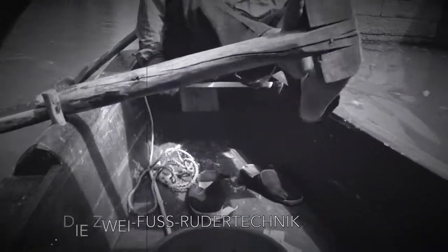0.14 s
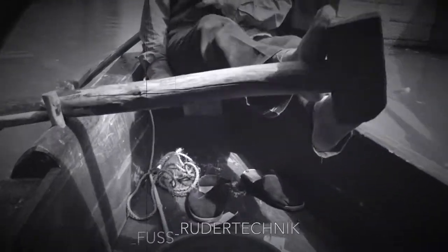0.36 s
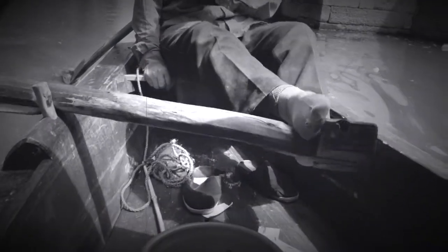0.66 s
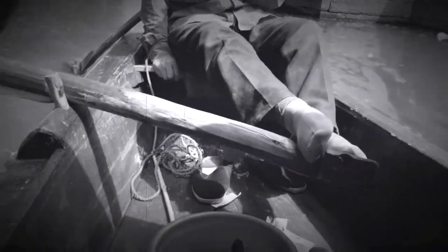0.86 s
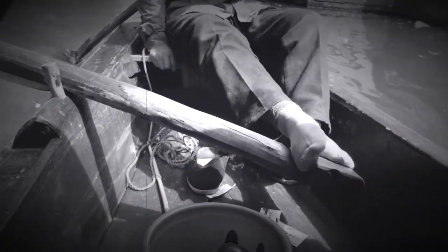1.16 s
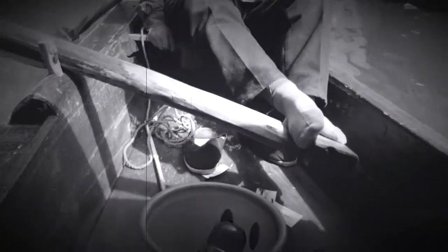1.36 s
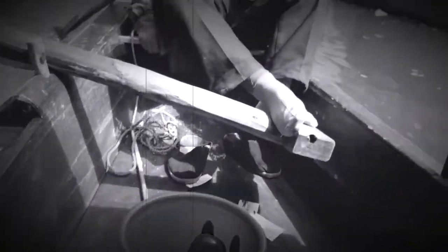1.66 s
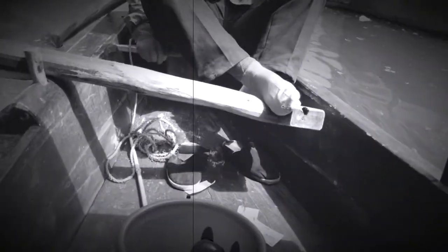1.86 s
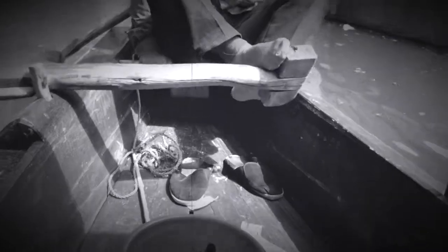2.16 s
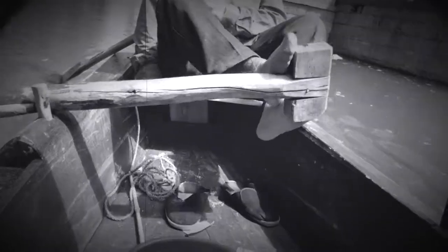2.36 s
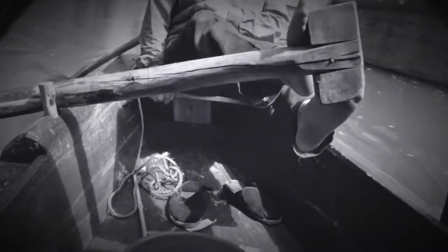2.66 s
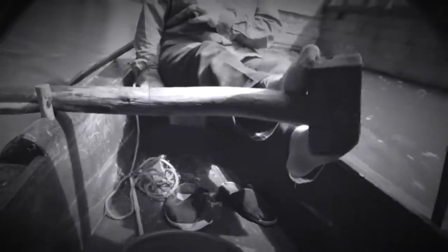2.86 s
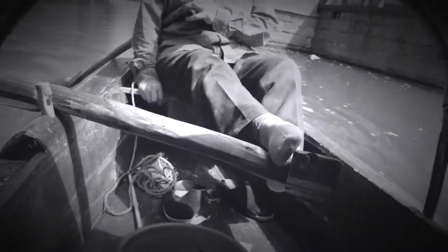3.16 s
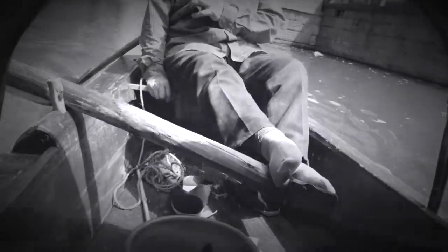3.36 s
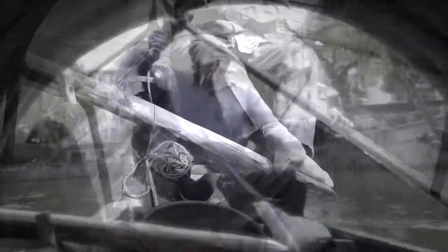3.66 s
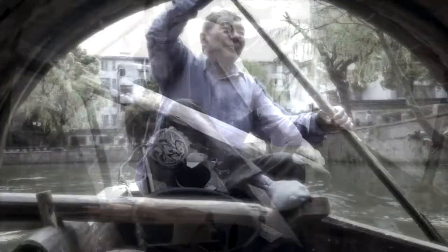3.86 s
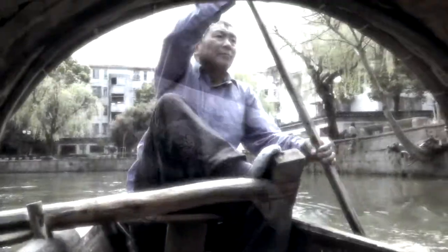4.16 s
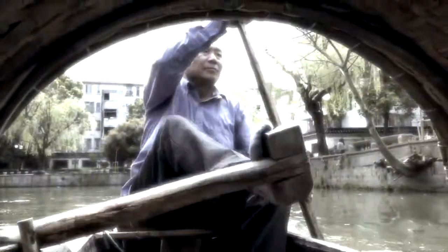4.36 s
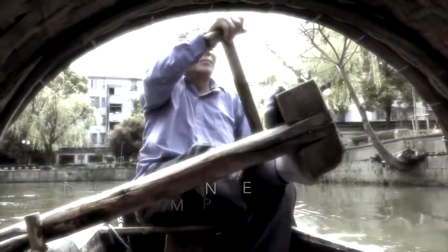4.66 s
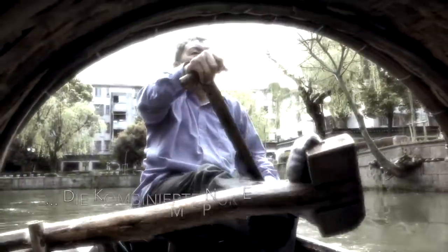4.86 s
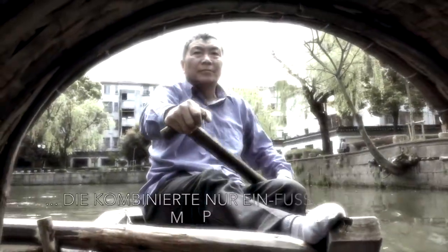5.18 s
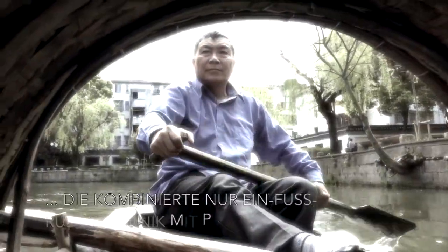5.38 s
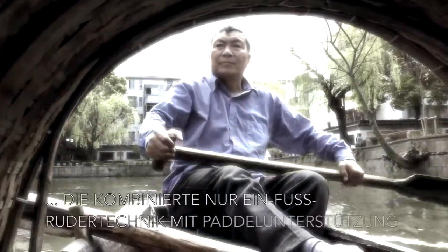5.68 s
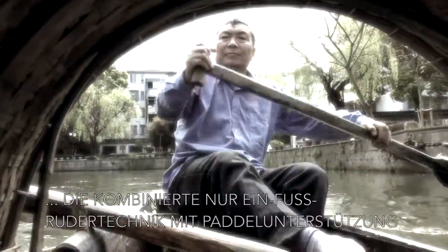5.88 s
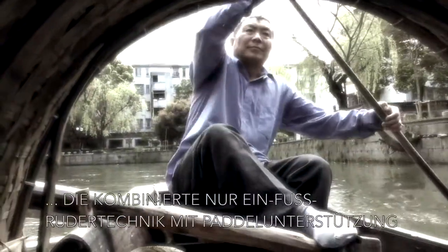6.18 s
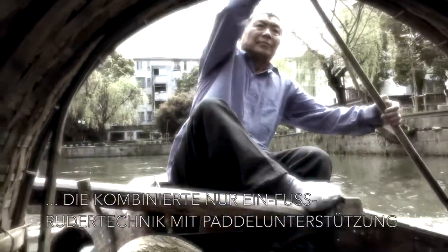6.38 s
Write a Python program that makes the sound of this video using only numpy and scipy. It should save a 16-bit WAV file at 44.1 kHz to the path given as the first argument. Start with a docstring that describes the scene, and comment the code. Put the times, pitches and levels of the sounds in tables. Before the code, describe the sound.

On a small wooden boat on a canal, an oar binds at its pivot and gives a short, very loud squeal almost at once, sliding down into a rough judder that rings the hull. Quiet lapping, cloth rubs and dry ticks follow, then a hard knock. A second, similar squeal comes mid-way. After it, wood ticks cluster, water gulps and a paddle splashes near the end. Close stereo microphone, faint hiss.

```python
"""Twice an oar binds on its pivot and squeals into the limiter, on a small wooden boat rowed along a canal.
Stick-slip: it catches, sings on a falling note (slip partials), breaks into a judder that rings the hull.
Knocks and ticks are noise bursts plus decaying modes; gulps are clusters of gliding bubble tones.
Lapping, spray, splash, rubs, rumble and hiss are shaped noise with gain curves; a faint hum is a sine."""
import sys
import numpy as np
from scipy import signal
from scipy.fft import rfft, irfft
from scipy.io import wavfile
from scipy.ndimage import uniform_filter1d, minimum_filter1d

SR = 44100
rng = np.random.default_rng(int(sys.argv[2]) if len(sys.argv) > 2 else 0)


def bounce(signal):
    """Save signal as a 16-bit WAV file at the path given by the first command-line argument."""
    frames = np.transpose(np.atleast_2d(signal))
    limited = np.clip(frames, -1, 1)
    pcm = np.round(limited * 32767).astype(np.int16)
    wavfile.write(sys.argv[1], SR, pcm)


N = 287973
TIME = np.arange(N) / SR
EDGE_HZ = 15900  # upper band limit


def amp(db):
    """Decibels to gain."""
    return 10 ** (np.asarray(db) / 20)


def unit(x):
    """Scales to rms 1."""
    return x / np.sqrt(np.mean(x ** 2) + 1e-20)


def blend(a, b, share):
    """Moves from a to b as share goes from 0 to 1."""
    return a + (b - a) * share


def ramp(t, s, length_s):
    """Linear 0 to 1 over length_s, centred on time s."""
    return np.clip((t - s) / length_s + .5, 0, 1)


def read(points, hz):
    """Reads a table on a log-frequency axis."""
    f, value = np.transpose(points)
    return np.interp(np.log(hz + 1), np.log(np.abs(f) + 1), value)


def add(mix, s, sound):
    """Mixes a sound in at time s."""
    part = mix[..., max(round(s * SR), 0):][..., :sound.shape[-1]]
    part += sound[..., :part.shape[-1]]


def wobble(n, hz):
    """Smooth random curve of rms 1, low-passed near hz."""
    f = np.fft.rfftfreq(n, 1 / SR)
    return unit(irfft(rfft(rng.standard_normal(n)) / (1 + (f / hz) ** 4), n))


def patches(shape, bins, frames):
    """Random time-frequency patches of rms 1."""
    smooth = uniform_filter1d(rng.standard_normal(shape), size=bins, axis=-2)
    return unit(uniform_filter1d(smooth, size=frames, axis=-1))


def swells(rows, rise_s):
    """Gain curve of swells that rise to a peak and fall exponentially; their powers add."""
    power = 0
    for s, db, fall_s in rows:
        distance = np.maximum((s - TIME) / rise_s, (TIME - s) / fall_s)
        power = power + amp(db) ** 2 * np.exp(-2 * distance)
    return np.sqrt(power)


def colour(x, spectrum, size=4096):
    """Causal minimum-phase filter of unit energy with the given spectrum."""
    hz = abs(np.fft.fftfreq(size, 1 / SR))
    log_gain = np.log(amp(np.maximum(read(spectrum, hz), -100)))
    taps = np.fft.ifft(np.exp(np.conj(signal.hilbert(log_gain)))).real[:size // 2]
    taps /= np.linalg.norm(taps)
    return np.apply_along_axis(lambda v: signal.oaconvolve(v, taps)[:len(v)], -1, x)


def ring(modes, gain=lambda hz: 1):
    """Answer of a set of decaying modes to one blow; signs alternate."""
    t = TIME[:SR // 2]
    out = 0
    for k, (hz, db, t60) in enumerate(modes):
        decay = amp(db - 60 * t / t60)
        out = out + (-1) ** k * gain(hz) * decay * np.sin(2 * np.pi * hz * t)
    return out


# left-right likeness: f/Hz, likeness/1
LIKENESS = [(60, 0.99), (700, 0.94), (1500, 0.85), (3000, 0.49), (6000, 0.12), (15000, 0.05)]
# left over right: f/Hz, level/dB
LEFT_LEAN = [(60, -2.5), (110, -3), (200, -1), (380, -2), (700, 0), (1290, -3.0), (2380, 0.5), (4400, 0.5),
             (8120, 0), (15000, 7.5)]


def pair(two):
    """Two unrelated sounds become a stereo pair: alike in the bass, left-right balance set by band."""
    hz = np.fft.rfftfreq(N, 1 / SR)
    a, b = rfft(two)
    same, lean = np.clip(read(LIKENESS, hz), -1, 1), amp(read(LEFT_LEAN, hz) / 2)
    mid, side = a * np.sqrt((1 + same) / 2), b * np.sqrt((1 - same) / 2)
    out = irfft(np.array([(mid + side) * lean, (mid - side) / lean]), N)
    return out / np.sqrt(np.mean(out.mean(0) ** 2))


def noise_pair(spectrum):
    """Coloured stereo noise."""
    return pair(colour(rng.standard_normal((2, N)), spectrum))


# hiss spectrum: f/Hz, density/dB rel.
HISS_SPECTRUM = [(120, -35), (200, -7), (305, -6.5), (394, -19), (491, -10.5), (805, -17), (851, -14.5),
                 (1620, -18.5), (2750, -33.5), (7000, -38), (16000, -49)]
# faint far hum: t/s, level/dB
HUM_LEVEL = [(0, -51), (1.3, -45), (1.9, -49), (3.3, -48), (3.9, -53), (6.53, -106)]


def air(hiss_db=-46, hum_hz=504.5, waver=0.0107, waver_hz=22.0):
    """Steady air hiss plus a faint far hum, a frequency-wavering sine."""
    turns = np.cumsum(hum_hz * (1 + waver * wobble(N, waver_hz))) / SR
    hum_gain = amp(np.interp(TIME, *np.transpose(HUM_LEVEL)))
    return amp(hiss_db) * noise_pair(HISS_SPECTRUM) + hum_gain * np.sin(2 * np.pi * turns)


# rumble spectrum: f/Hz, density/dB rel.
RUMBLE_SPECTRUM = [(12, -59), (20, -4), (54, 1.5), (102, 2), (140, -4), (233, -5), (296, -3.5),
                   (336, -14.5), (366, -14.5), (400, -13.5), (520, -40), (880, -120)]
# hull rocks and rumbles: t/s, level/dB rel., fall/s
HULL_ROCKINGS = [(0.0, -39, 0.1), (2.05, -38, 0.24), (5.31, -32, 0.095)]


def rumble(gain_db=4, before_db=-46, after_db=-40, step_s=3.93, step_length_s=0.057, rocking_rise_s=0.022):
    """Low noise whose steady level steps up at step_s; the rocking hull adds swells."""
    steady = amp(blend(before_db, after_db, ramp(TIME, step_s, step_length_s)))
    gain = np.hypot(steady, swells(HULL_ROCKINGS, rocking_rise_s))
    return amp(gain_db) * gain * noise_pair(RUMBLE_SPECTRUM)


# pulls of the oar: t/s of the peak, level/dB rel., calming/s
OAR_STROKES = [(0.0, -32, 0.81), (2.47, -31, 0.7), (4.45, -31.5, 0.16)]


def stirred(rise_s=0.21):
    """Gain of the water stirred by each oar pull, then calming."""
    return swells(OAR_STROKES, rise_s)


# lapping spectrum: f/Hz, level/dB rel.
LAP_SPECTRUM = [(150, -26), (250, 1), (329, -22), (360, -3), (403, -8), (504, -5), (586, -10), (726, -7.5),
                (1110, -12.5), (1580, -14.5), (1740, -15.5), (2160, -17.5), (5000, -39.5), (6500, -70),
                (11000, -120)]
# wavelets slap the hull: t/s, level/dB rel., fall/s
HULL_WAVELETS = [(1.08, -41.5, 0.6), (2.27, -43, 0.04), (3.26, -39, 0.071), (3.47, -35, 0.041),
                 (3.66, -38, 0.19), (3.97, -33, 0.084), (5.05, -38, 0.096), (5.4, -34, 0.055),
                 (6.27, -29, 0.068), (6.43, -32.5, 0.021), (6.52, -30.5, 0.049)]


def lapping(gain_db=-1, patchy_db=5.0, calm_db=-46.5, rise_s=0.045):
    """Noise in small shifting time-frequency patches; oar and wavelets raise it above calm."""
    z = signal.stft(rng.standard_normal((2, N)), nperseg=512)[2]
    z = z * amp(patchy_db * patches(z.shape[1:], bins=3, frames=3))
    lap = pair(colour(signal.istft(z, nperseg=512)[1][:, :N], LAP_SPECTRUM))
    raised = np.hypot(stirred(), swells(HULL_WAVELETS, rise_s))
    return amp(gain_db) * np.hypot(amp(calm_db), raised) * lap


# spray spectrum, for drops and fizz: f/Hz, level/dB rel.
SPRAY_SPECTRUM = [(1500, -12), (3000, 0.5), (4200, 0), (5500, 1), (7000, -4.5), (9000, -6.5), (12000, -9.5),
                  (15000, -24), (20000, -38)]


def droplets(per_s=130, size_db=4, splash_s=0.0022, patchy_db=5):
    """Random drops, each a short noise decay with a colour of its own."""
    sizes = amp(size_db * np.minimum(rng.exponential(1, N), 3.5)) * (rng.random(N) < per_s / SR)
    decays = signal.lfilter([1], [1, -np.exp(-1 / (splash_s * SR))], sizes)
    z = signal.stft(decays * rng.standard_normal((2, N)), nperseg=256)[2]
    z = z * amp(patchy_db * patches(z.shape, bins=8, frames=3))
    return colour(signal.istft(z, nperseg=256)[1][:, :N], SPRAY_SPECTRUM)


# paddle scatters drops: t/s, level/dB rel., fall/s
PADDLE_SPRAYS = [(3.25, -64, 0.3), (3.95, -42, 0.009), (3.995, -46.5, 0.039), (4.33, -53, 0.083),
                 (5.04, -60.5, 0.9), (5.42, -48.5, 0.069), (5.545, -46, 0.017), (5.69, -56, 0.035),
                 (6.03, -60, 0.42), (6.24, -49, 0.027), (6.39, -53, 0.16)]


def spray(fizz_db=-5, drops_db=-1, calm_db=-74, stroke_db=-26.5, rise_s=0.015):
    """Fine fizz noise plus drops; oar strokes and paddle raise both."""
    sound = amp(fizz_db) * noise_pair(SPRAY_SPECTRUM) + amp(drops_db) * pair(droplets())
    raised = np.hypot(amp(stroke_db) * stirred(), swells(PADDLE_SPRAYS, rise_s))
    return np.hypot(amp(calm_db), raised) * sound


# splash spectrum: f/Hz, level/dB rel.
SPLASH_SPECTRUM = [(2500, 0.5), (4300, 5.5), (5500, -10), (7000, -1), (9000, -5), (12000, -0.5),
                   (15000, -11.5), (20000, -18)]
# paddle throws up a sheet of water: t/s, level/dB rel., fall/s
PADDLE_SPLASHES = [(6.24, -44.5, 0.3), (6.42, -34, 0.038), (6.51, -41.5, 0.05)]


def splash(crackle_db=6.5, crackle_hz=144, lean_db=4, rise_s=0.034):
    """Sheet of fine spray, left-heavy: noise with a crackling random gain."""
    crackle = unit(amp(crackle_db * wobble(N, crackle_hz)))
    sheet = colour(crackle * rng.standard_normal((2, N)), SPLASH_SPECTRUM)
    return swells(PADDLE_SPLASHES, rise_s) * sheet * amp([[lean_db], [-lean_db]])


def bubble(hz, length_s, glide=0.029):
    """Air pocket: decaying sine that rises in pitch."""
    t = np.arange(0, length_s, 1 / SR)
    u = t / length_s
    tone = np.sin(2 * np.pi * hz * t * (1 + glide * u / 2))
    return tone * np.exp(-5 * u) * (1 - np.exp(-u / 0.14))


# gulps at blade and hull: t/s, level/dB rel., f/Hz, length/s
WATER_GULPS = [(2.388, -19, 1350, 0.03), (2.873, -27, 1480, 0.04), (3.038, -22.5, 878, 0.046),
               (3.445, -26.5, 643, 0.1), (3.621, -25, 540, 0.065), (3.99, -22.5, 1690, 0.026),
               (4.4, -25, 600, 0.074), (4.497, -20, 1084, 0.05), (4.591, -26.5, 1420, 0.04),
               (4.721, -25, 1544, 0.043), (5.926, -16.5, 597, 0.029), (6.222, -21, 754, 0.07),
               (6.277, -19, 1106, 0.046), (6.511, -18.5, 704, 0.048)]


def gulps(count=9, spread=0.2, small_db=-7, small_s=0.02):
    """Each gulp is one large bubble in a cluster of smaller, detuned ones."""
    out = np.zeros(N)
    for s, db, hz, length_s in WATER_GULPS:
        add(out, s, amp(db) * bubble(hz, length_s))
        for delay, detune in zip(rng.random(count), rng.standard_normal(count)):
            small = bubble(hz * np.exp(spread * detune), small_s)
            add(out, s + delay * length_s * 0.61, amp(db + small_db) * small)
    return out


# foot slides along the oar: t/s, length/s, level/dB
FOOT_RUBS = [(0.54, 0.26, -52.5), (0.975, 0.018, -40.5), (1.055, 0.066, -55), (1.425, 0.073, -48),
             (2.12, 0.11, -44), (2.412, 0.13, -52)]
# rub spectrum: f/Hz, level/dB rel.
RUB_SPECTRUM = [(800, 0), (2400, 3.5), (3500, 6.5), (4500, -1.5), (7000, -9.5), (10000, -20.5),
                (14000, -16), (16000, -25)]


def rubs(grain_db=3, grain_hz=300):
    """Short strokes of cloth on wood: noise with a random grain."""
    stroke = np.zeros(N)
    for s, length_s, db in FOOT_RUBS:
        add(stroke, s, amp(db) * signal.windows.tukey(round(length_s * SR), .3))
    grain = amp(grain_db * wobble(N, grain_hz))
    return stroke * pair(colour(rng.standard_normal((2, N)) * grain, RUB_SPECTRUM))


# dry wood ticks: t/s, level/dB rel., ping f/Hz, treble/dB rel., low/dB rel.
WOOD_TICKS = [(0.978, -26.5, 2030, 1, 26), (1.183, -14.5, 1840, 9, -9), (1.294, -23.5, 1670, -2, -2),
              (1.993, -23, 1610, -5, -3), (2.001, -25, 1440, 2, -3), (2.254, -25.5, 1790, -5, -13),
              (2.505, -13.5, 2160, 3, -6.5), (3.043, -30, 1530, -9, 3), (3.639, -32, 1420, 19, 6),
              (3.916, -22, 1840, 2, 3), (4.054, -22.5, 1690, 2, 3), (4.185, -14.5, 1770, 4.5, 2.5),
              (4.213, -24, 1650, 6, 2), (4.324, -14, 1710, 3, 8), (4.339, -18.5, 1670, -5, -3),
              (4.483, -20.5, 1690, 6.5, 9), (4.862, -24.5, 1630, 2, 10)]
# tick modes: f/Hz, level/dB rel., t60/s
WOOD_TICK_MODES = [(531, -0.5, 0.038), (995, 4, 0.011), (1490, -3, 0.032), (1834, 10, 0.0057),
                   (1920, 9, 0.0062), (2548, 3.5, 0.011), (3500, 2.5, 0.0038), (4710, -2, 0.0028),
                   (6950, -1.5, 0.0027)]


def ticks(tick_db=2, snap=0.1, snap_s=0.0012, ping_db=7, ping_t60_s=0.023):
    """Single slips of the wood: noise snap, short modes and one ping that depends on the spot."""
    out, t = np.zeros(N), TIME[:SR // 2]
    for s, db, ping_hz, treble_db, low_db in WOOD_TICKS:
        tilt = [(500, low_db), (1700, 0.0035), (6000, treble_db)]  # f/Hz, level/dB
        tick = ring(WOOD_TICK_MODES, lambda hz: amp(read(tilt, hz)))
        tick += ring([(ping_hz, ping_db, ping_t60_s)])
        tick += snap * amp(treble_db) * rng.standard_normal(len(t)) * np.exp(-t / snap_s)
        add(out, s, amp(db + tick_db) * tick / abs(tick).max())
    return out


# wood knocks: t/s, level/dB rel., boom/dB rel., post ring/dB rel.; all but the one at 3.944 s are the oar
# dropping against its post, and that one comes as the paddle enters the water
OAR_KNOCKS = [(1.991, -13, -3.5, -12), (1.996, -7, 1.5, -2.5), (3.944, -17.5, -15, -15),
              (5.276, -22, 8, -10), (5.384, -24.5, 8, -9.5), (5.925, -31, 7, -13)]
# modes of the boat's bottom: f/Hz, level/dB rel., t60/s
BOTTOM_MODES = [(63.6, -11.5, 0.54), (101.1, -1.5, 0.28), (132, -11.5, 0.57), (169.4, -8, 0.2),
                (263, -19.5, 0.46)]
# crack spectrum: f/Hz, level/dB rel.
CRACK_SPECTRUM = [(180, -42), (300, -16), (580, 2.5), (840, 0.5), (1140, 1), (1600, -10.5), (2200, -12),
                  (3000, -34), (4000, -24), (5800, -45), (14000, -67)]
# modes of the post: f/Hz, level/dB rel., t60/s
POST_RING_MODES = [(513, -34, 0.12), (714, -16, 0.35), (845, 0, 0.13), (1050, -26, 0.24)]


def knocks(crack_t60_s=0.089, boom_rise_s=0.01, crack_db=-8.0, post_db=-7, boom_db=-5):
    """A noise crack, the ringing post, and the slower boom of the boat's bottom."""
    out, t = np.zeros(N), TIME[:SR // 2]
    boom = ring(BOTTOM_MODES) * (1 - np.exp(-t / boom_rise_s))
    post = ring(POST_RING_MODES)
    for s, db, low_db, ring_db in OAR_KNOCKS:
        crack = colour(rng.standard_normal(len(t)) * amp(-60 * t / crack_t60_s), CRACK_SPECTRUM)
        knock = amp(crack_db) * crack
        knock += amp(post_db + ring_db) * post
        knock += amp(low_db + boom_db) * boom
        add(out, s, amp(db) * knock)
    return out


def boat(x, near_db=-4.0, near_t60_s=0.053, near_hz=2300, direct_db=-2, bank_db=-46, bank_t60_s=0.14):
    """Near boards scatter treble oppositely to each side; canal walls add a faint decaying tail."""
    t, hz = TIME[:SR // 2], np.fft.rfftfreq(N, 1 / SR)
    near, *bank = rng.standard_normal((3, len(t)))
    near = near * amp(-60 * t / near_t60_s) * (t > .001)
    # phase only: flat spectrum before truncation
    near = irfft(np.exp(1j * np.angle(rfft(near))), len(t))[:len(t) // 2]
    near = signal.sosfilt(signal.butter(2, near_hz, "high", fs=SR, output="sos"), near)
    side = amp(near_db) * signal.oaconvolve(x, near)[:N]
    bank_spectrum = [(100, -1.0), (500, -27.0), (2000, -31.0), (6000, -18.0), (16000, -44.0)]  # f/Hz, dB
    bank = colour(bank * amp(-60 * t / bank_t60_s) * (t > .02), bank_spectrum)
    bank = amp(bank_db) * bank / np.linalg.norm(bank[0])
    walls = signal.oaconvolve(x[None], bank, axes=1)[:, :N]
    direct = irfft(rfft(x) * amp(read([(1500, 0.0098), (4500, direct_db)], hz)), N)
    return np.array([direct + side, direct - side]) + walls


# dense plank ringing: f/Hz, level/dB rel.
PLANK_SPECTRUM = [(40, -53), (120, 12), (400, 8.5), (800, -7), (1500, -0.5), (2300, 4), (3500, -6.5),
                  (16000, -26)]
# plank decay: f/Hz, t60/s
PLANK_DECAY = [(120, 0.22), (400, 0.26), (1000, 0.18), (2200, 0.086), (4000, 0.087), (12000, .05)]


def planks(x):
    """Dense board modes as a noise tail; the decay time depends on frequency, shortest in the top."""
    hz, t, z = signal.stft(rng.standard_normal(SR // 2), SR, nperseg=256)
    tail_db = read(PLANK_SPECTRUM, hz)[:, None] - 60 * t / read(PLANK_DECAY, hz)[:, None]
    tail = signal.istft(z * amp(tail_db), SR, nperseg=256)[1]
    return signal.oaconvolve(x, tail / np.sqrt(SR * .016))[:N]


GRIP_S, RELEASE_S = 0.013, 0.014  # force build-up, die-away
LOCK_S, BREAK_S, SETTLE_S = 0.0027, 0.0052, 0.01305  # to lock, to break loose, to settle to judder rate
CATCH_DB, PRESS_DB, JUDDER_SWELL_DB = 4, 0.5, 5.5  # extra catch force, growth over note, over judder
ROUGH_CATCH, ROUGH_NOTE, ROUGH_BREAK = 0.44, 0.053, 0.99  # 0-1
# note loses its grip briefly: t/s, half length/s, force/dB rel., added roughness/1
NOTE_FALTERS = [(0.158, 0.0076, -1, 0.21), (0.175, 0.004, -11, 0.42), (0.206, 0.005, -1, 0.2),
                (2.59, 0.01, 4.5, 0.53), (2.614, 0.0044, -20.5, 0.22)]


def friction(row, pitch):
    """Time, slip rate, force, roughness: rough catch, clean note pressed ever harder, slower judder."""
    catch, lock, loose, end, note_db, judder_db, judder_hz, judder_rough = row
    t = np.arange(catch, end + RELEASE_S, 1 / SR)
    locked, broken = ramp(t, lock, LOCK_S), ramp(t, loose, BREAK_S)
    settled = 1 - np.exp(-np.maximum(t - loose, 0) / SETTLE_S)
    hz = blend(np.interp(t, *np.transpose(pitch)), judder_hz, settled)
    press = PRESS_DB * np.clip((t - lock) / (loose - lock), 0, 1)
    force_db = note_db + CATCH_DB * (1 - locked) + press
    rough = blend(ROUGH_CATCH, ROUGH_NOTE, locked)
    for s, half_s, db, extra in NOTE_FALTERS:
        falter = np.exp(-((t - s) / half_s) ** 2)
        force_db = force_db + db * falter
        rough = rough + extra * falter
    judder_force_db = judder_db + JUDDER_SWELL_DB * ((t - loose) / (end - loose) - .5)
    force_db = blend(force_db, judder_force_db, broken)
    rough = blend(rough, blend(ROUGH_BREAK, judder_rough, settled), broken)
    grip = (np.minimum((t - catch) / GRIP_S, 1) * np.minimum((t[-1] - t) / RELEASE_S, 1)) ** 2
    return t, hz, grip * amp(force_db), np.clip(rough, 0, 1)


# locked note: f/Hz, level/dB rel.
SING_SPECTRUM = [(300, -1), (480, 2.5), (900, -9.5), (1350, -21.5), (1800, -19.5), (2200, -19),
                 (2700, -26.5), (3100, -26), (4000, -34), (6000, -43), (16000, -73.5)]
# judder: f/Hz, level/dB rel.
RASP_SPECTRUM = [(40, -46.5), (115, 3.5), (195, -10.5), (255, -0.5), (360, -1), (650, 5.5), (1000, 6.5),
                 (1300, -5.5), (2200, -4.5), (2800, -17.5), (3900, -18.5), (6000, -32.5), (16000, -48.5)]
# dry pivot as it catches: f/Hz, level/dB rel.
BITE_SPECTRUM = [(800, -27), (1700, -2.5), (2050, 27), (2300, 13), (2600, -4), (3000, -6), (4200, -31),
                 (6000, -47), (16000, -70)]


def squeal(row, pitch, jitter=0.13, waver=.007, grit=1.0, uneven_db=6, limp=0.13, blur=0.055,
           sing_db=3, rasp_db=-0.5, rub=0.043, bite_db=-3, bite_s=0.019, grain_db=3):
    """Stick-slip: locked to the oar it sings; unlocked, slips come unevenly in time and size."""
    t, hz, force, rough = friction(row, pitch)
    n = len(t)
    rate = 1 + waver * wobble(n, 120) + jitter * rough ** 3 * wobble(n, 327)
    turns = np.cumsum(hz * rate) / SR
    orders = np.arange(1, 36)[:, None]
    # slip shape varies, blurring the high partials
    drift = blur * orders * np.array([wobble(n, 93) for _ in orders])
    # partials above the first swell and fade as the contact moves over the grain
    heights = amp(grain_db * (orders > 1) * np.array([wobble(n, 25) for _ in orders]))
    partials = heights * np.cos(2 * np.pi * orders * turns + drift)
    slips = unit((partials * (orders * hz < EDGE_HZ)).sum(0))
    # fibres scrape during each slip
    scrape = unit((0.83 + np.exp(-(turns % 1) / .5)) * rng.standard_normal(n))
    note = colour(slips + rub * scrape, SING_SPECTRUM)
    note /= np.sqrt(uniform_filter1d(note ** 2, size=400) + 1e-9)  # level flattened
    # strong and weak slips alternate with roughness
    sizes = amp(uneven_db * rough * wobble(n, 263)) * (1 + limp * rough * np.cos(np.pi * turns))
    drive = unit(slips * sizes) + grit * np.sqrt(rough) * scrape
    bite_gain = amp(bite_db) * np.exp(-((t - t[0]) / bite_s) ** 2)
    bite = bite_gain * unit(colour(drive, BITE_SPECTRUM))
    locked = np.clip(1 - 1.25 * rough, 0, 1)
    loose = (1 - locked) ** .7
    sung = force * (amp(sing_db) * locked * note + bite)
    rasped = force * amp(rasp_db) * loose * unit(colour(drive, RASP_SPECTRUM))
    return sung, rasped


# oar binds on its pivot: catch t/s, lock t/s, break t/s, let-go t/s, note force/dB rel.,
# judder force/dB rel., judder slip rate f/Hz, judder roughness/1
PIVOT_SQUEALS = [(0.137, 0.150, 0.291, 0.322, 5, -4, 371.3, 0.95),
                 (2.560, 2.581, 2.725, 2.773, 4, -0.5, 350.1, 0.58)]
# slip rate up to the break, one curve a squeal: t/s, f/Hz
SLIP_PITCH = [
    [(0.14, 618.5), (0.15, 563), (0.164, 530.5), (0.17, 495.9), (0.204, 488), (0.214, 437.7),
     (0.238, 439.8), (0.29, 422.7)],
    [(2.562, 636.5), (2.574, 632), (2.58, 614.6), (2.592, 477.8), (2.596, 467), (2.608, 512.4),
     (2.678, 465.3), (2.725, 419.5)],
]
# oar and hull ringing together: f/Hz, level/dB rel., t60/s
HULL_MODES = [(137.1, -6, 1), (235, 7, 0.2), (264, -33, 0.33), (357.6, 3, 0.082), (422, -8, 0.18),
              (500, -4, 0.15), (640, -0.5, 0.063), (730, -33, .2), (900, -20, 0.17), (1058, -3.5, 0.16),
              (1150, -30, .14), (1730, -10, 0.12), (2030, -31, .15), (2020, -17, .16)]


def pivot(hull_db=2, planks_db=-6, wide_db=-16, note_leak_db=-20):
    """Both squeals; mostly the judder shakes hull and planks, which ring on either side."""
    note, judder = np.zeros((2, N))
    for row, pitch in zip(PIVOT_SQUEALS, SLIP_PITCH):
        sung, rasped = squeal(row, pitch)
        add(note, row[0], sung)
        add(judder, row[0], rasped)
    body = ring(HULL_MODES)
    body /= abs(rfft(body)).max()
    shake = judder + amp(note_leak_db) * note
    hull = amp(hull_db) * signal.oaconvolve(shake, body)[:N]
    ahead = note + judder + hull + amp(planks_db) * planks(shake)
    wide = np.array([planks(shake), planks(shake)])
    return boat(ahead, near_t60_s=.012) + amp(wide_db) * wide


def scene():
    """Air and water, then small wood and gulp sounds, then the squealing pivot."""
    background = air() + rumble() + lapping() + spray() + splash()
    small = boat(knocks() + ticks() + gulps(), near_db=0, near_t60_s=0.016, near_hz=2820, direct_db=-1)
    small = small * amp([[-.5], [.5]])  # left, right dB
    return background + rubs() + small + pivot() * amp([[-.2], [.2]])


def record(dry, ceiling=1.0):
    """Fast look-ahead limiter at the ceiling, then a low-pass at the band limit."""
    allowed = np.minimum(1, ceiling / (abs(dry).max(0) + 1e-9))
    limited = dry * uniform_filter1d(minimum_filter1d(allowed, size=71), size=61)
    low_pass = signal.firwin(511, EDGE_HZ, window=("kaiser", 9), fs=SR)
    return signal.oaconvolve(limited, low_pass[None], "same")


dry = scene()
out = record(dry)
bounce(out)
```